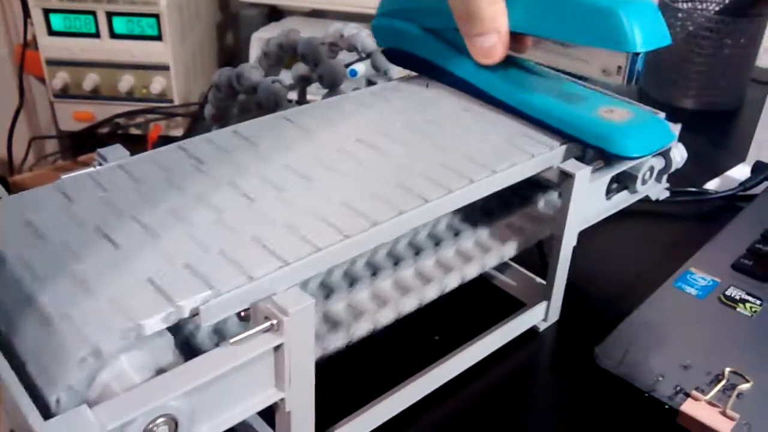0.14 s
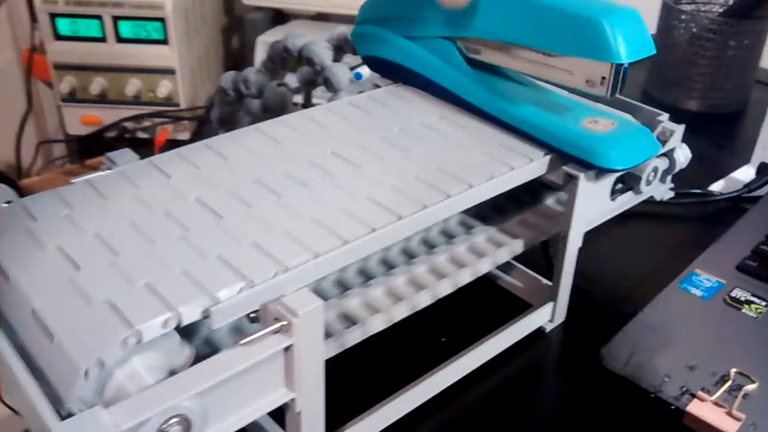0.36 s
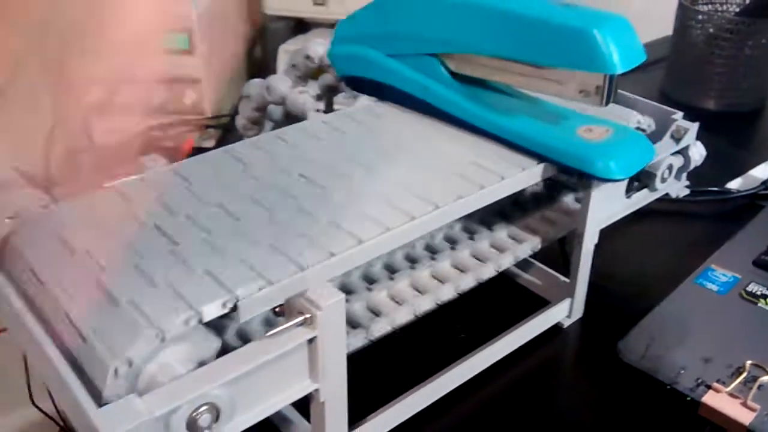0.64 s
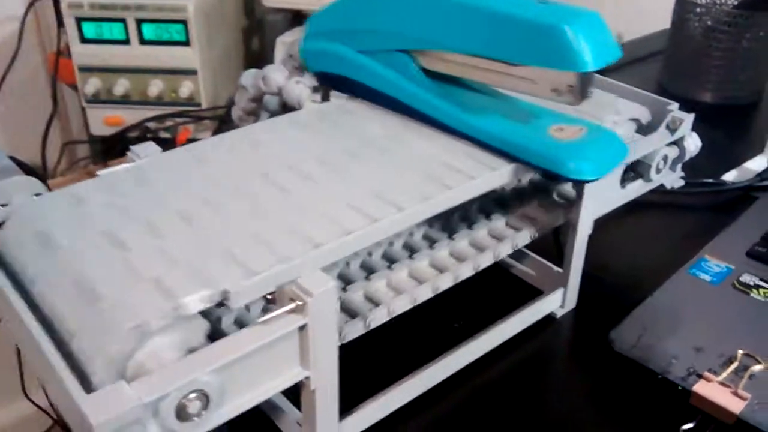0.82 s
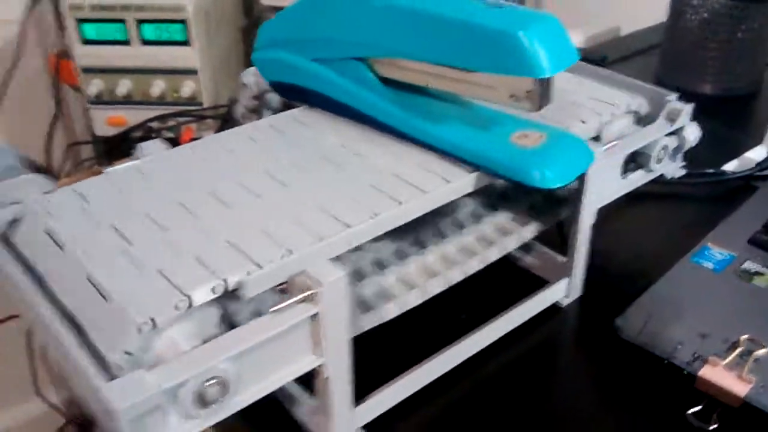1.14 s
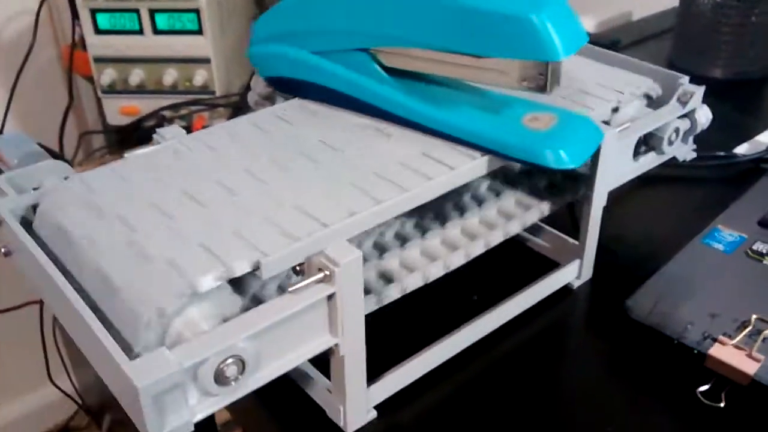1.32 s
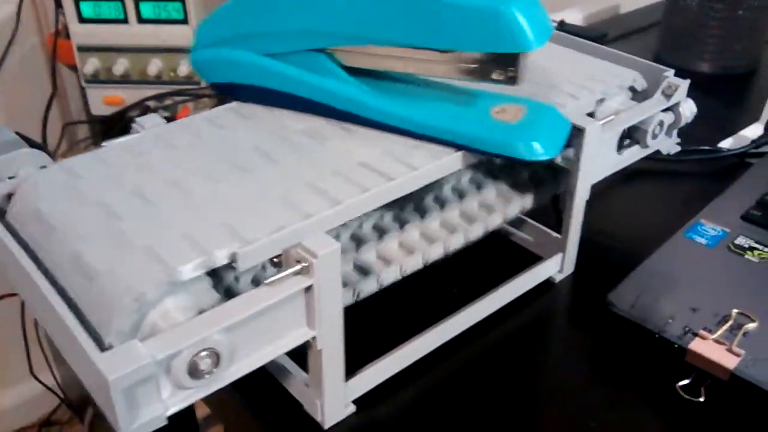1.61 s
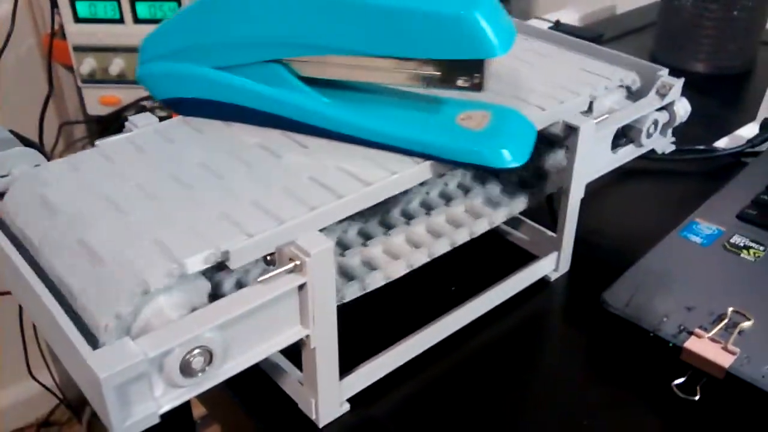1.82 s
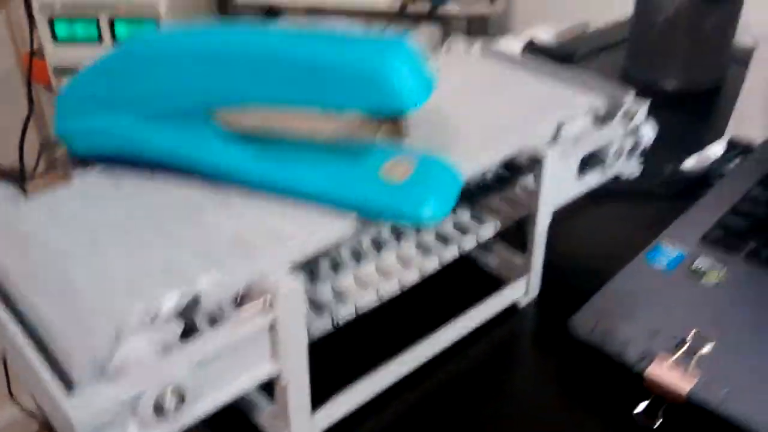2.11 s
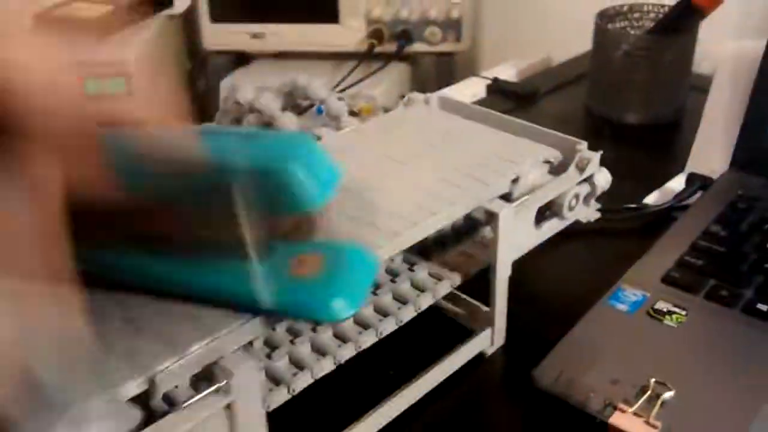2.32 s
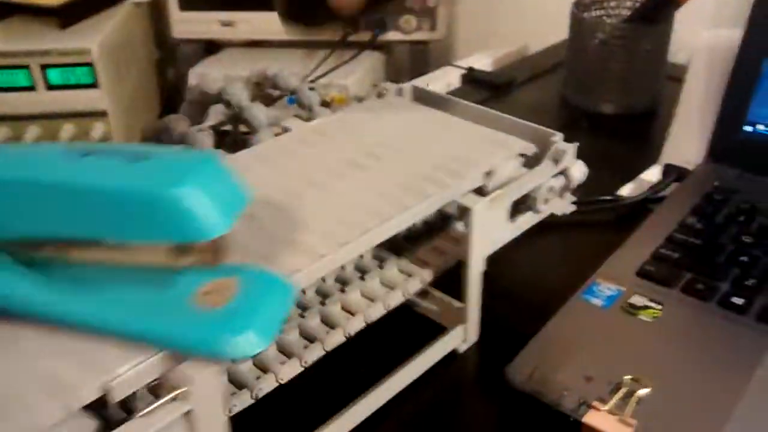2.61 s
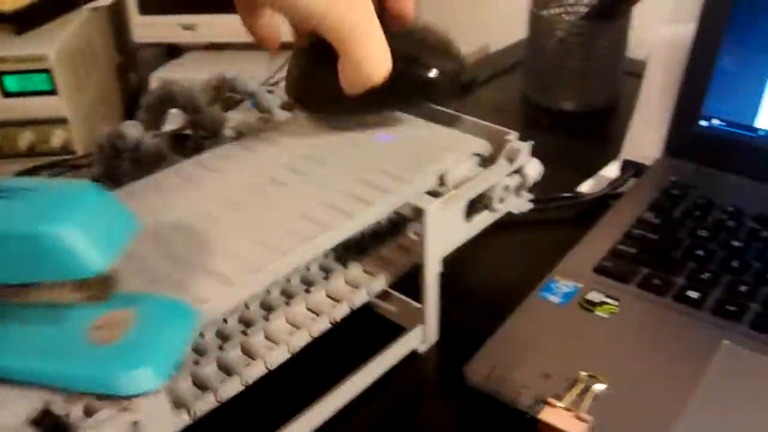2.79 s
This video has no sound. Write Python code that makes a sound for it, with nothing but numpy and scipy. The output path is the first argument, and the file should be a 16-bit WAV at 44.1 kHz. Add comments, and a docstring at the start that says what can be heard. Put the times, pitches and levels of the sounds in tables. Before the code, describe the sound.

A small plastic conveyor runs without pause, its links snapping and rattling irregularly over a gritty sliding hiss and faint motor whirr; dull bumps come midway and late, with a knock at the end; close stereo microphone, small room.

```python
"""On a desk in a small room, a little plastic conveyor carries a stapler; another item is set on it at the end.
Two spaced microphone ports listen from close by. Links snap over the sprockets as short noise bursts and
rattle in the frame's modes; the belt slides with gritty filtered hiss and faint gliding squeaks.
Dull thuds and short knocks decay as noise, hinge pins tick, and the drive gives wavering tones and whirr."""
import sys
import numpy as np
from scipy import signal
from scipy.fft import rfft, irfft
from scipy.io import wavfile

SR = 44100
rng = np.random.default_rng(int(sys.argv[2]) if len(sys.argv) > 2 else 0)


def master_out(mix):
    """Clip the mix to full scale and print it as 16-bit PCM to the path in sys.argv[1]."""
    frames = np.transpose(np.atleast_2d(mix))
    ceiling = np.clip(frames, -1, 1)
    pcm = np.round(ceiling * 32767).astype(np.int16)
    wavfile.write(sys.argv[1], SR, pcm)


N = 130095

# Drive hum: pitch_hz, level_db
HUM_TONES = [(59, -65.5), (104, -66)]
# Drone of the frame: time_s, level_db
DRONE_LEVEL = [(0, -70), (.12, -42), (.22, -59), (.3, -54), (.66, -57.5), (1.4, -60), (2.4, -58.5),
               (2.95, -52)]
# Gear whirr: time_s, low_band_db, middle_band_db, top_band_db
WHIRR_LEVELS = [(0, -62, -58, -58), (.3, -54.5, -56, -59), (.6, -56, -64, -59), (1.0, -56, -72, -65),
                (1.3, -53.5, -62, -59), (1.8, -52, -66, -60), (2.3, -68, -79, -68), (2.55, -59, -64, -66),
                (2.7, -57, -56, -69), (2.95, -66, -56, -66)]
# The whirr's bands, low to top: centre_hz, width_hz
WHIRR_BANDS = [(6860, 420), (9000, 1400), (11250, 380)]
# Spectrum of the room's rumble: frequency_hz, relative_db
RUMBLE_COLOUR = [(20, -8), (60, 16), (80, 3), (125, 4.5), (155, 1.5), (250, 0.5), (500, -14), (2000, -29)]
# Level course of the sliding belt, before the trims of its layers: time_s, level_db
SLIDE_LEVEL = [(0.0, -50), (0.5, -52.5), (0.71, -44), (1.19, -45.5), (1.49, -45), (1.72, -45), (2.08, -45),
               (2.19, -47), (2.4, -49), (2.95, -47)]
# Spectrum of the sliding hiss and grit: frequency_hz, relative_db
SLIDE_COLOUR = [(1000, -2.5), (2000, 8), (2550, 5.5), (3200, 8), (3900, 0), (4650, -3), (5200, 5),
                (5800, -14), (6400, -25), (6900, 13), (7500, -6.5), (9000, 6), (11200, -1.5), (12300, -0.5),
                (15000, -8)]
# Rails singing under the belt: centre_hz, width_hz, level_db (against SLIDE_LEVEL)
RAILS = [(4040, 200, -15), (4810, 89, -8.5), (6040, 970, -12), (8120, 75, -16), (8660, 200, -30.5),
         (8900, 100, -17), (10780, 120, -13.5)]
# Level course of the rattling belt, before its trim: time_s, level_db
RATTLE_LEVEL = [(0, -47), (.28, -51), (.45, -47.5), (.66, -45.5), (.92, -47.5), (1.1, -47.5), (1.46, -48.5),
                (1.65, -50), (1.85, -45.5), (2.08, -47.5), (2.25, -45.5), (2.33, -51.5), (2.45, -46.5),
                (2.58, -52), (2.95, -46.5)]
# Spectrum of the rattling links: frequency_hz, relative_db
RATTLE_COLOUR = [(100, 6), (220, -26), (350, 2.5), (550, 10), (900, -2.5), (1300, -2), (2000, -17.5),
                 (2700, -21), (3700, 5), (5000, 7.5), (12000, -27)]
# Modes of the frame: pitch_hz, relative_db, t60_s
FRAME_MODES = [(281, 10, 0.43), (352, 9, 0.22), (404, 2.5, 0.056), (503, 3.5, 0.045), (552.5, -24, 0.12),
               (697, 0.5, 0.071), (770, -9.5, 0.027), (903, 2.5, 0.07), (1189, 1, 0.14), (1368, -6, 0.12),
               (1837, -4, 0.17)]
# Bands of the hinge-pin ticks: low_hz, high_hz
TICKLET_BANDS = [(3200, 4200), (5200, 8100), (7800, 11200)]
# Link snaps, levels before trims and colour: start_s, clack_db (frame), knock_db (hollow), knock_hz,
# ring_db (link), ring_hz, tick_db (edge), tick_hz, chatter_t60_s, after_rattle_db (against the crack)
SNAPS = [(0.0098, -73, -72, 496, -51, 4140, -38.5, 10350.0, 0.008, -12),
         (0.0161, -44, -68, 490, -55, 3470, -41.5, 10230.0, 0.003, -9),
         (0.045, -43.5, -54, 800, -44, 4060, -37, 6400, 0.004, -22),
         (0.1524, -47.5, -50.5, 870, -48.5, 3940, -56, 9060.0, 0.0067, -14),
         (0.2168, -42, -57, 818, -48.5, 3670, -47, 6820.0, 0.0076, -18),
         (0.2363, -45, -59, 877, -54, 3570, -44, 5300, 0.011, -5),
         (0.248, -46, -45, 516, -44, 3740, -50, 5990.0, 0.0045, -20),
         (0.27, -45, -49.5, 840, -69, 3670, -53, 7000, 0.013, 1),
         (0.2837, -43, -43, 890, -39.5, 3520, -37, 5700, 0.016, -10),
         (0.3647, -45.5, -45, 770, -53, 3740, -52, 6800, 0.0028, -11),
         (0.3761, -64, -70, 505, -52, 3670, -36.5, 10500, 0.0022, -14),
         (0.44, -48, -61, 760, -52, 3850, -48, 6300, 0.0056, -3),
         (0.5058, -45.5, -62, 2000, -48, 3640, -45, 6940.0, 0.0045, -12),
         (0.522, -49, -43, 1600, -50, 3640, -39, 9400, 0.003, -8),
         (0.534, -36, -42, 1940, -40, 3850, -36, 10600, 0.014, -6.5),
         (0.5774, -50, -52, 910, -42.5, 3900, -40, 6450, 0.0073, -6),
         (0.6201, -41.5, -51, 2200, -50, 3330, -47, 5500, 0.0049, 3),
         (0.639, -37, -42, 2220, -43.5, 3750, -39, 6700, 0.01, -3),
         (0.672, -43, -58, 450, -40, 4160, -40.5, 6340.0, 0.0036, -8),
         (0.7295, -38.5, -40, 990, -28, 3550, -30, 6400, 0.0093, -7.5),
         (0.8546, -44.5, -53, 495, -40, 3460, -35.5, 8900, 0.0054, -12),
         (0.8785, -55, -45, 764, -45, 4150, -49, 5590.0, 0.007, -13),
         (0.8923, -51.5, -39.5, 725, -56, 4120, -57, 6920.0, 0.011, -13),
         (0.93, -43.5, -50, 790, -64, 3550, -52, 7120.0, 0.012, -12),
         (0.9467, -39.5, -41, 790, -37.5, 3860, -30.5, 9900, 0.0095, -9.5),
         (0.9633, -41.5, -46, 930, -51, 3800, -44, 5900, 0.0064, -13),
         (1.0679, -47.5, -42, 1840, -42.5, 3600, -44, 5370, 0.0028, 1),
         (1.0798, -46, -56, 1830, -60, 3650, -33.5, 10200, 0.0052, -16),
         (1.197, -42, -50, 675, -50, 3680, -46, 6940, 0.014, 1),
         (1.2413, -42.5, -46, 721, -40, 3800, -38, 10100, 0.029, -11),
         (1.3259, -38, -43, 920, -36, 3670, -34, 6100, 0.0089, -23),
         (1.3964, -41, -55, 2000, -43, 3530, -33, 9900, 0.017, -7.5),
         (1.458, -50, -53, 920, -62, 3990, -44, 8100, 0.0064, -17),
         (1.5022, -34.5, -61, 690, -27, 3640, -27, 10000, 0.0055, -8.5),
         (1.549, -44.5, -46.5, 746, -49, 3720, -40.5, 6840.0, 0.0061, -0.5),
         (1.6216, -58, -55, 716, -45, 3440, -48, 6560, 0.013, -8),
         (1.6498, -45, -58, 524, -58, 3640, -46, 5960.0, 0.0065, -1),
         (1.7233, -43, -50, 1180, -46, 4070, -38.5, 7800, 0.012, -7),
         (1.7565, -40.5, -43.5, 1930, -33.5, 3920, -38.5, 5850.0, 0.0094, -8),
         (1.7819, -40, -45, 510, -45, 3370, -41, 6200, 0.015, -12),
         (1.828, -42, -61, 1981, -43, 3720, -44, 11100, 0.0087, -2),
         (1.8474, -46, -48, 440, -43, 4030, -41, 6700, 0.0085, -28),
         (1.8784, -38.5, -45, 1150, -27.5, 3850, -33.5, 10000, 0.0026, -11.5),
         (1.9024, -46.5, -54, 980, -47, 4060, -44, 7350.0, 0.008, -13),
         (1.9304, -46, -51, 700, -45, 3950, -50, 10480.0, 0.0073, -16),
         (1.9517, -45.5, -43, 780, -57, 3770, -43, 10400, 0.004, -18),
         (2.0351, -42, -57, 1930, -34, 3600, -30.5, 9100, 0.0067, -16),
         (2.058, -53, -48, 431, -36, 3720, -36.5, 6700, 0.0078, -15),
         (2.1396, -39, -41.5, 447, -23, 3870, -31.5, 6410.0, 0.0048, -15),
         (2.1667, -42, -53, 1949, -56, 3800, -44, 5400.0, 0.012, -1),
         (2.1865, -44.5, -44, 1954, -28, 3700, -28, 8410.0, 0.0062, -11),
         (2.1901, -38, -45, 1410, -33, 3800, -48, 5400.0, 0.016, -10),
         (2.2, -37.5, -47, 1370, -40, 3900, -41, 6700, 0.015, -0.5),
         (2.227, -54, -40, 770, -46, 3730, -65, 7100, 0.009, 1),
         (2.373, -41.5, -53, 760, -49, 3520, -42.5, 10080.0, 0.009, -9),
         (2.3886, -51.5, -53, 470, -59, 3680, -39, 10100, 0.0057, -8),
         (2.4083, -58, -49, 786, -49, 3600, -51, 7580.0, 0.011, -5),
         (2.4298, -50, -45.5, 780, -45.5, 3630, -54, 6430.0, 0.0049, -7),
         (2.4858, -46, -44.5, 710, -45.5, 3740, -43, 10150.0, 0.0044, -8),
         (2.5262, -50, -51, 1840, -49, 3780, -49, 5600, 0.0047, -10),
         (2.6341, -41, -55, 921, -43.5, 3830, -39, 8700, 0.0067, -7),
         (2.6456, -50, -44, 1530, -48, 4050, -38, 8600, 0.003, -17),
         (2.6932, -39, -41, 1873, -54, 4050, -33.5, 9100, 0.0012, -17),
         (2.726, -57, -43.5, 2150, -42, 3800, -44, 5340, 0.01, -12),
         (2.781, -40.5, -49, 2140, -38.5, 4130, -37, 9500, 0.014, -12.5),
         (2.9356, -39, -47, 1930, -65, 3570, -57, 6760.0, 0.006, -15),
         (2.9425, -36.5, -48, 947, -50, 3700, -36.5, 6500, 0.0085, -10)]
# Spectrum laid over all snaps: frequency_hz, relative_db
SNAP_COLOUR = [(150, 5), (350, -3), (800, 2), (1400, -1), (2000, 2), (2600, 5.5), (3700, 0), (4700, 6),
               (6200, 4.5), (7800, -2.5), (10200, -0.5), (12500, -7.5), (15500, -16)]
# Dull bumps and short hollow knocks: start_s, thud_db, t60_s, resonance_hz, width_hz (before its cap),
# resonance_db
BUMPS = [(0.736, -42, 0.22, 412, 400, -38.5), (1.505, -48, 0.11, 376, 395, -31.5),
         (2.141, -40, 0.072, 440, 400, -44), (2.189, -43.5, .1, 480, 300, -40.5),
         (2.21, -52, 0.028, 670, 497, -33), (2.229, -42, 0.16, 680, 500, -42),
         (2.887, -41, 0.051, 350, 150, -53), (2.905, -32.5, 0.096, 500, 150, -38),
         (2.934, -42, 0.084, 350, 150, -43)]
# Spectrum of the thuds: frequency_hz, relative_db
BUMP_COLOUR = [(40, -51), (105, 8), (200, 0.5), (350, 4.5), (520, -7), (800, -44), (1500, -14), (4000, -56)]
# Belt squeaks on its rail: start_s, length_s, start_hz, end_hz, peak_db
SQUEAKS = [(0.811, 0.065, 450, 486, -45), (1.712, 0.1, 1244, 1130, -47), (2.246, 0.075, 1300, 1413, -48.5),
           (2.303, 0.055, 1350, 1310, -56)]
# The two ports: frequency_hz, left_minus_right_db, likeness (0 to 1), left_lead_rad
PORTS = [(60.5, 0, 0.66, 3), (160, 5, 0, -0.1), (265, 2, 0.64, 1.27), (730, 5, 0.76, 0.5),
         (1240, 0.5, 0.89, 0), (2098, 2.5, 1, 2), (2380, 0, .9995, 3.06), (2550, 0, 1, 3.14),
         (2770, 0, .9995, 3.22), (2906, 4.5, 1, 4.5), (3390, -2.5, 1, 5.5), (4505, 3.5, 0.74, 9),
         (4570, .2, .992, 9.3), (4760, .3, .992, 9.52), (5150, 3, 0, 9), (5700, 7.5, 1, 12.5),
         (8060, 13, 0.47, 17), (7200, 7.5, 0, 17), (10370, 5.5, 0.36, 20), (15200, 3, 0.6, 36)]

DRONE_HZ = 341.4
WAVER, WAVER_HZ = 0.8, 8  # rms depth of the swell, and its speed limit
RUMBLE_DB = -53.5
HISS_DB, GRIT_DB = -6.5, -8.5  # against SLIDE_LEVEL
GRIT_PER_S, GRIT_SPREAD_DB = 330, 1
RAIL_FLICKER_DB, RAIL_FLICKER_HZ = 4, 22
RATTLE_TRIM_DB, RATTLE_PER_S, RATTLE_SPREAD_DB, RATTLE_T60_S = -5, 590, 3.5, 0.046
FRAME_RATTLE_DB, FRAME_SNAP_DB = -50, -7
TICKLETS_PER_S, TICKLET_DB, TICKLET_SPREAD_DB, TICKLET_T60_S = 22, -52.5, 1, 0.011  # in each band
# Trims on the snap levels
CLACK_TRIM_DB, KNOCK_TRIM_DB, RING_TRIM_DB, TICK_TRIM_DB, PING_TRIM_DB = -3.5, -3, -3, -2.5, -9
CLACK_T60_S, CLACK_TAIL_DB = 0.011, -2.5
KNOCK_T60_S, KNOCK_TAIL_DB = 0.023, -7
KNOCK_WIDTH_HZ, RING_WIDTH_HZ, PING_WIDTH_HZ = 240, 676, 840
SNAP_RISE_S = 0.0015
SCATTER_DB, SCATTER_T60_S = 2, 0.085  # after-rattle and reflections off the desk
ROOM_DB, ROOM_T60_S = 0, 0.19  # room tail
DIFFUSE_DB = -23  # share of the snaps that arrives from all round
CUTOFF_HZ = 15700

TIME = np.arange(N) / SR
SIZE = 147456  # transform length, padded past N
HZ = np.maximum(np.arange(SIZE // 2 + 1) * SR / SIZE, 1)
TINY = 1e-18  # keeps silent filters out of denormal numbers


def from_db(db):
    """Decibels to gain."""
    return 10 ** (np.asarray(db) / 20)


def rms_one(x):
    """Scale to unit rms."""
    return x / np.sqrt(np.mean(x ** 2) + 1e-20)


def at_hz(points, column=1):
    """A table column joined by straight lines over log frequency."""
    table = np.array(points)
    return np.interp(np.log(HZ), np.log(table[:, 0]), table[:, column])


def level(curve):
    """Gain over time from time_s, level_db points."""
    return from_db(np.interp(TIME, *np.transpose(curve)))


def dying(t, t60):
    """Exponential decay that starts at t = 0 and falls 60 dB in t60 seconds."""
    return (t >= 0) * np.exp(-np.log(1000) * np.abs(t) / t60)


def filtered(x, response):
    """Apply a frequency response."""
    return irfft(rfft(x, SIZE) * response)[..., :N]


def colour(x, points):
    """Causal (minimum-phase) filter through frequency_hz, relative_db points."""
    cepstrum = irfft(np.log(from_db(at_hz(points))))
    # folding the cepstrum onto positive time makes the phase minimal
    cepstrum[1:SIZE // 2] *= 2
    cepstrum[SIZE // 2 + 1:] = 0
    return filtered(x, np.exp(rfft(cepstrum)))


def lowpassed_noise(limit_hz, shape):
    """Slow random wander, rms 1."""
    low = signal.butter(2, limit_hz, fs=SR, output="sos")
    return rms_one(signal.sosfilt(low, rng.standard_normal(shape)))


def noise(points):
    """Two unrelated coloured noises; rms 1."""
    return rms_one(colour(rng.standard_normal((2, N)), points))


def band_noise(hz, width_hz):
    """Two unrelated noises in one narrow band; rms 1."""
    band = signal.butter(2, [hz - width_hz / 2, hz + width_hz / 2], "band", fs=SR, output="sos")
    return rms_one(signal.sosfilt(band, rng.standard_normal((2, N))))


def wavering(hz):
    """A tone whose strength and phase wander."""
    swell, sway = lowpassed_noise(WAVER_HZ, (2, N))
    phase = 2 * np.pi * hz * TIME + 2 * WAVER * sway
    return np.sqrt(2) * (1 + WAVER * swell) * np.sin(phase)


def drive():
    """The motor hums, the frame drones with it and the gears whirr, over the room's rumble."""
    tones = []
    for _ in range(2):
        hum = sum(from_db(db) * wavering(hz) for hz, db in HUM_TONES)
        tones.append(level(DRONE_LEVEL) * wavering(DRONE_HZ) + hum)
    times, *band_levels = np.transpose(WHIRR_LEVELS)
    whirr = 0
    for band_db, (hz, width) in zip(band_levels, WHIRR_BANDS):
        whirr = whirr + from_db(np.interp(TIME, times, band_db)) * band_noise(hz, width)
    return np.array(tones) + whirr + from_db(RUMBLE_DB) * noise(RUMBLE_COLOUR)


def grains(per_s, spread_db):
    """Random tiny contacts, most weak and a few strong; rms 1."""
    sizes = from_db(spread_db * np.minimum(rng.exponential(1, N), 4))
    signs = rng.choice([-1, 1], N)
    return rms_one(sizes * signs * (rng.random(N) < per_s / SR))


def flicker(depth_db, rate_hz):
    """A gain that wanders at random."""
    return from_db(depth_db * lowpassed_noise(rate_hz, N))


def slide():
    """The belt rubs along its rails: hiss with grit, and rail resonances that catch and let go."""
    contacts = np.array([grains(GRIT_PER_S, GRIT_SPREAD_DB) for _ in range(2)])
    grit = rms_one(colour(contacts, SLIDE_COLOUR))
    rails = 0
    for hz, width, db in RAILS:
        singing = band_noise(hz, width) * flicker(RAIL_FLICKER_DB, RAIL_FLICKER_HZ)
        rails = rails + from_db(db) * rms_one(singing)
    hiss = noise(SLIDE_COLOUR)
    return level(SLIDE_LEVEL) * (from_db(HISS_DB) * hiss + from_db(GRIT_DB) * grit + rails)


def frame(x):
    """The frame's modes in parallel, each a decaying resonance with its own gain."""
    out = 0
    for hz, db, t60 in FRAME_MODES:
        r = dying(1 / SR, t60)
        feed = [(1 - r * r) / 2, 0, (r * r - 1) / 2]
        feedback = [1, -2 * r * np.cos(2 * np.pi * hz / SR), r * r]
        out = out + from_db(db) * signal.lfilter(feed, feedback, x + TINY)
    return out


def rattle():
    """Loose links jostle all the time and keep the frame ringing."""
    strikes = grains(RATTLE_PER_S, RATTLE_SPREAD_DB) ** 2
    # strike energies add up and die away; the root is the amplitude
    energy = signal.lfilter([1], [1, -dying(2 / SR, RATTLE_T60_S)], strikes + TINY)
    contacts = np.sqrt(energy) * rng.standard_normal((2, N))
    course = level(RATTLE_LEVEL)
    links = from_db(RATTLE_TRIM_DB) * course * rms_one(colour(contacts, RATTLE_COLOUR))
    return links + from_db(FRAME_RATTLE_DB) * rms_one(frame(contacts * course))


def burst(low_hz, high_hz, t60, tail_db):
    """A contact cracks in one band, then rattles on and dies in the room; the crack has rms 1 over 10 ms."""
    t = TIME[:SR // 7]
    band = signal.butter(2, [low_hz, min(high_hz, .45 * SR)], "band", fs=SR, output="sos")
    near = dying(t - .003, SCATTER_T60_S)
    far = dying(t - .008, ROOM_T60_S)
    scatter = from_db(SCATTER_DB) * near / np.linalg.norm(near)
    room = from_db(ROOM_DB) * far / np.linalg.norm(far)
    tail = np.hypot(scatter, room)
    attack = dying(t, t60) * (1 - np.exp(-t / SNAP_RISE_S))
    shapes = np.array([attack, tail])
    # part (crack, echoes) by port by time
    signs = rng.choice([-1., 1.], (2, 2, len(t)))
    parts = signal.sosfilt(band, signs * shapes[:, None] + TINY)
    crack, echoes = parts / np.linalg.norm(parts, axis=-1, keepdims=True)
    return np.sqrt(SR / 100) * (crack + from_db(tail_db) * np.linalg.norm(tail) * echoes)


def burst_around(hz, width_hz, t60, tail_db):
    """A contact burst in a band centred on its pitch."""
    return burst(hz - width_hz / 2, hz + width_hz / 2, t60, tail_db)


def snaps():
    """A link snaps: edge tick, brief link ring, frame clack, hollow knock; the frame rings on."""
    x = np.zeros((2, N + SR))
    for start, clack_db, knock_db, knock_hz, ring_db, ring_hz, tick_db, tick_hz, t60, tail_db in SNAPS:
        clack = burst(303, 2230, CLACK_T60_S, CLACK_TAIL_DB)
        knock = burst_around(knock_hz, KNOCK_WIDTH_HZ, KNOCK_T60_S, KNOCK_TAIL_DB)
        ping = burst_around(tick_hz, PING_WIDTH_HZ, t60, tail_db)
        ring = burst_around(ring_hz, RING_WIDTH_HZ, t60, tail_db)
        tick = burst(5530, 16500, t60, tail_db)
        sound = (from_db(clack_db + CLACK_TRIM_DB) * clack
                 + from_db(knock_db + KNOCK_TRIM_DB) * knock
                 + from_db(tick_db + PING_TRIM_DB) * ping
                 + from_db(ring_db + RING_TRIM_DB) * ring
                 + from_db(tick_db + TICK_TRIM_DB) * tick)
        i = max(int(start * SR), 0)
        x[:, i:i + sound.shape[1]] += sound
    x = colour(x[:, :N], SNAP_COLOUR)
    return x + from_db(FRAME_SNAP_DB) * frame(x)


def ticklets():
    """Hinge pins tick faintly at random moments, in three bands with a short decay."""
    out = 0
    for low_hz, high_hz in TICKLET_BANDS:
        spread = TICKLET_SPREAD_DB * np.clip(rng.standard_normal(N), -2, 2)
        clicks = from_db(TICKLET_DB + spread) * (rng.random(N) < TICKLETS_PER_S / SR)
        tick = burst(low_hz, high_hz, TICKLET_T60_S, tail_db=-8.5)
        out = out + signal.fftconvolve(clicks[None], tick, axes=1)[:, :N]
    return out


def bumps():
    """Dull thuds and short knocks, each with a hollow resonance of its own."""
    thud = noise(BUMP_COLOUR)
    out = 0
    for start, thud_db, t60, hz, width, body_db in BUMPS:
        body = band_noise(hz, min(width, 1.6 * hz))  # the cap keeps the lower edge above 0 Hz
        out = out + dying(TIME - start, t60) * (from_db(thud_db) * thud + from_db(body_db) * body)
    return out


def squeaks():
    """Faint gliding tones where the belt sticks and slips."""
    out = 0
    for start, length, start_hz, end_hz, db in SQUEAKS:
        progress = np.clip((TIME - start) / length, 0, 1)
        pitch_hz = start_hz + (end_hz - start_hz) * progress
        tone = np.sin(2 * np.pi * np.cumsum(pitch_hz) / SR)
        out = out + from_db(db) * np.sin(np.pi * progress) * tone
    return out


def ports(left, other):
    """The right port hears the left's sound shifted in phase and level, partly replaced by another version."""
    half = from_db(at_hz(PORTS) / 2)  # the level difference is split between the ports
    alike = np.clip(at_hz(PORTS, 2), 0, 1)
    lag = np.exp(-1j * at_hz(PORTS, 3)) / half
    shared = filtered(left, alike * lag)
    separate = filtered(other, 1j * np.sqrt(1 - alike ** 2) * lag)
    return np.array([filtered(left, half), shared + separate])


def scene():
    """All sources at the two ports; a share of the snaps, sides swapped, also comes back from all round."""
    links = snaps()
    sources = drive() + slide() + rattle() + links + ticklets() + bumps() + squeaks()
    return ports(*sources) + from_db(DIFFUSE_DB) * links[::-1]


def record(dry):
    """The top is cut steeply by an elliptic low-pass."""
    return signal.sosfilt(signal.ellip(10, .1, 80, CUTOFF_HZ, fs=SR, output="sos"), dry)


dry = scene()
out = record(dry)
master_out(out)
```